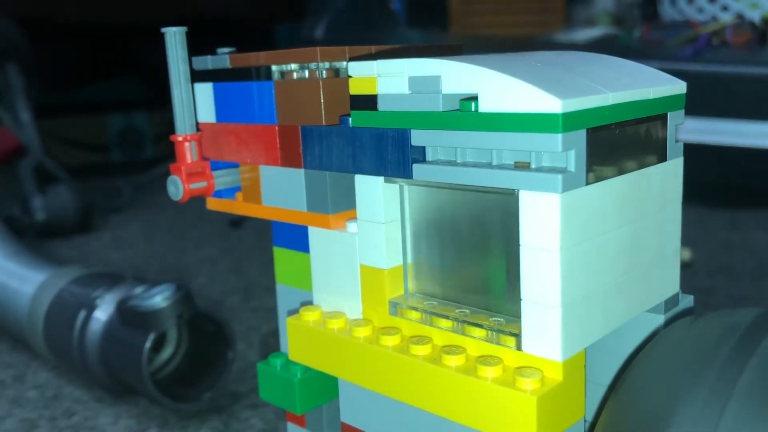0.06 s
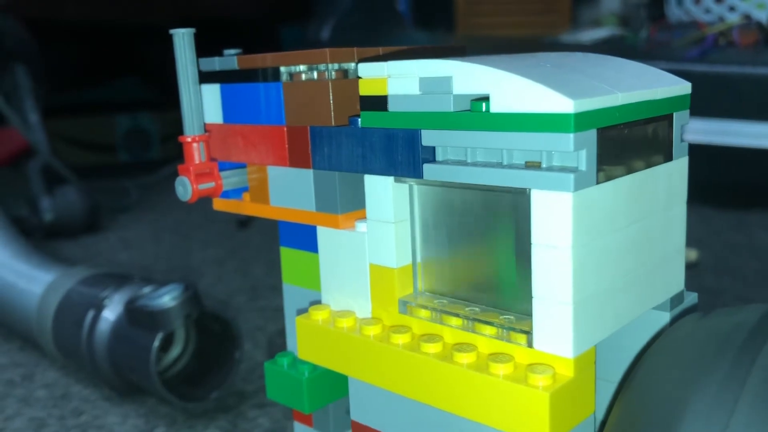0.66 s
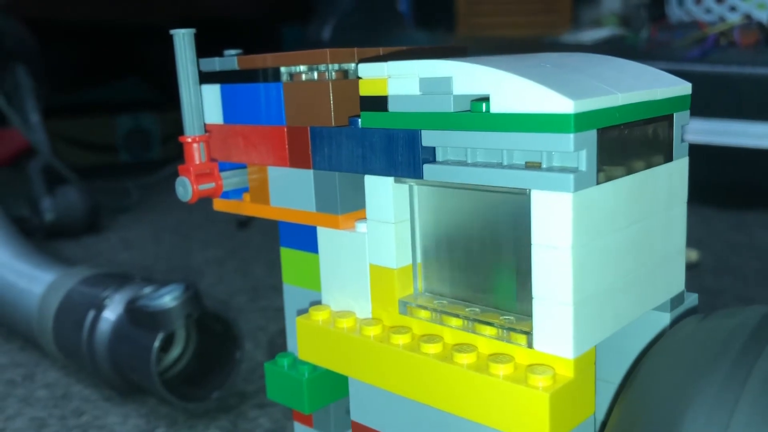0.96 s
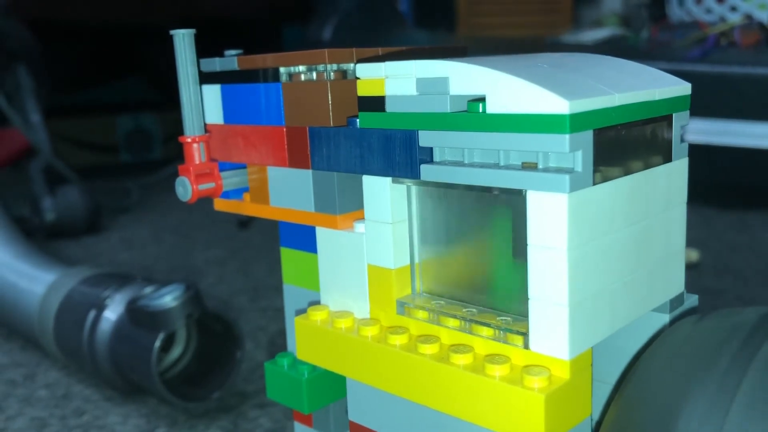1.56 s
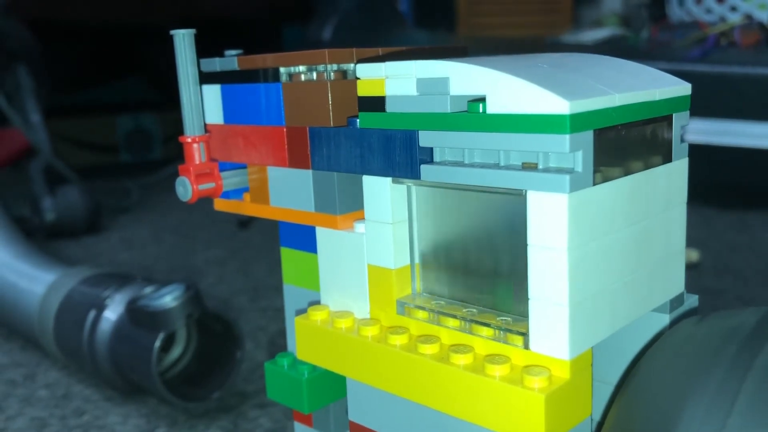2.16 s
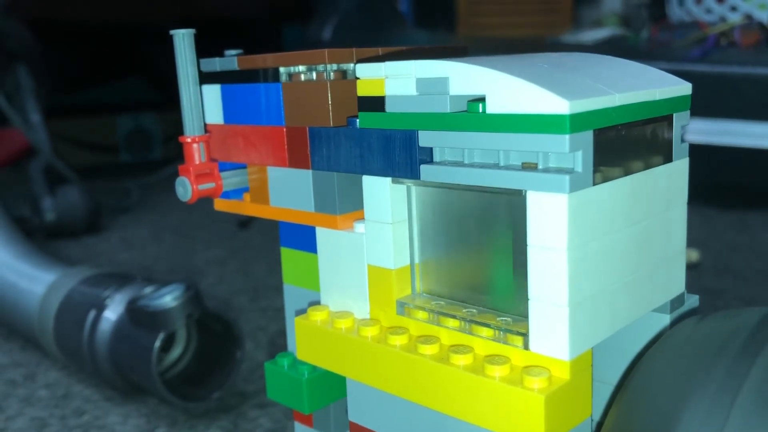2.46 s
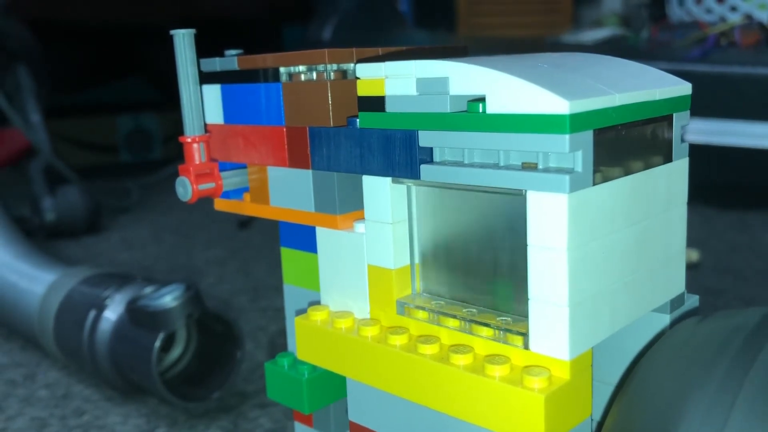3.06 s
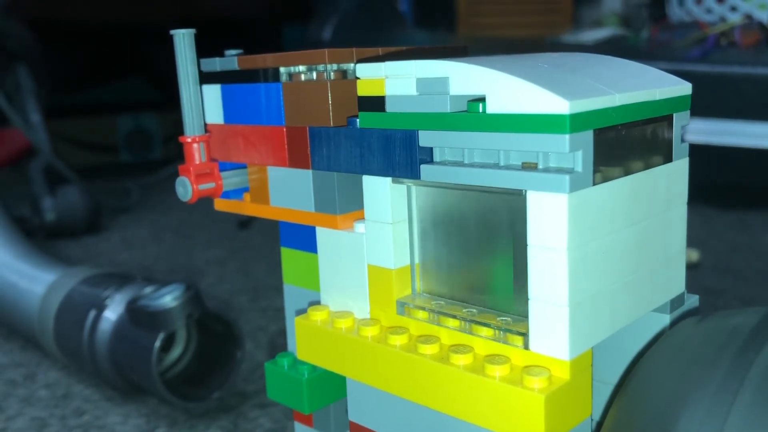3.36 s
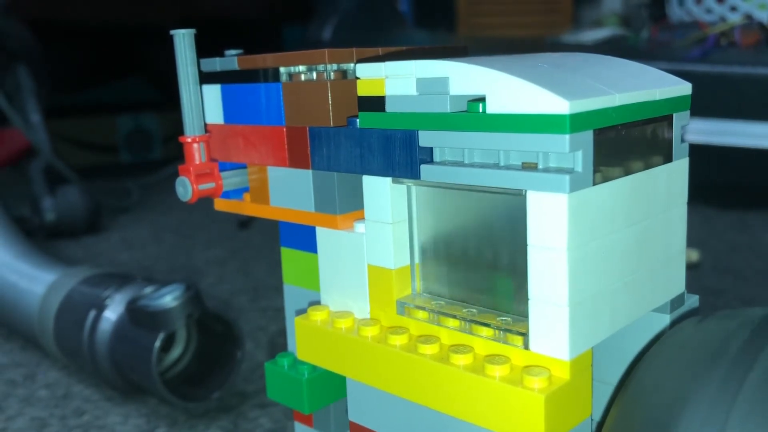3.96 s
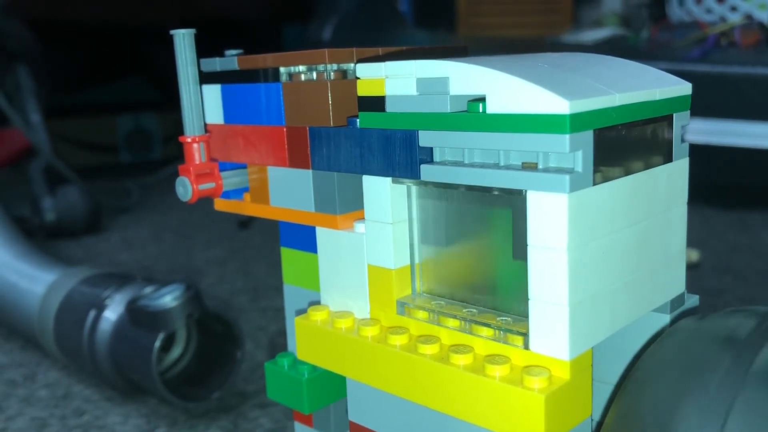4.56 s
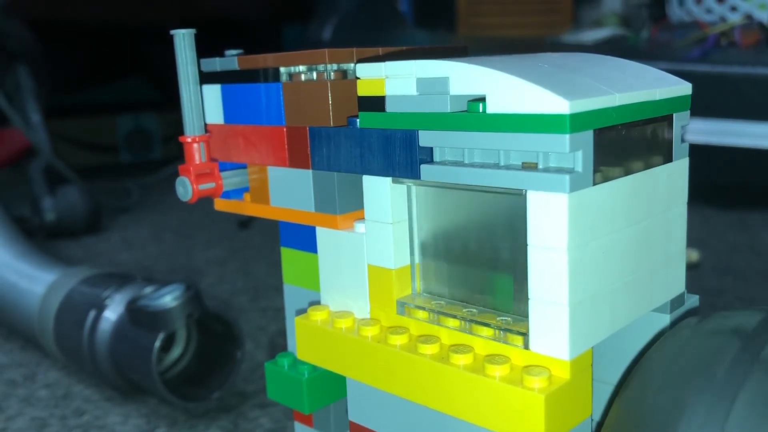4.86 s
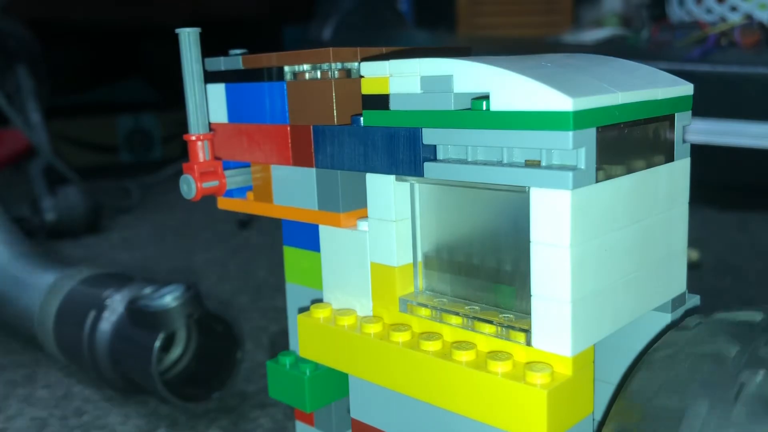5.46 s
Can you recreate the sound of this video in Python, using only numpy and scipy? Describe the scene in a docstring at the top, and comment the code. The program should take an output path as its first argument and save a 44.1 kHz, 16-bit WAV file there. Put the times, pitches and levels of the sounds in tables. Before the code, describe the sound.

A toy piston engine built of plastic bricks clacks once a turn, close to the microphone in a room. It speeds up twice and slows after each surge, with light knocks, high ticks, rattling bricks and pulsing air hiss. As it coasts to a stop, the axle gives two tiny squeaks, then a hand rustles softly. A vacuum cleaner hums faintly throughout.

```python
"""A toy piston engine of plastic bricks clacks once a turn, close by in a room, driven by suction.
It speeds up twice and coasts to a stop. Each clack cracks through the thin walls and rings frame and
chamber; the crank knocks in its play, the slide valve ticks, loose bricks chatter and intake air hisses.
A dry axle squeaks as the engine dies, then a hand rustles past. The vacuum cleaner that supplies
the suction hums throughout."""
import sys
import numpy as np
from scipy import signal
from scipy.fft import rfft, irfft
from scipy.io import wavfile

SR = 44100
rng = np.random.default_rng(int(sys.argv[2]) if len(sys.argv) > 2 else 0)


def wrap_up_sound(samples):
    """Save the sound to the file named by the first command line argument, as 16-bit audio."""
    columns = np.atleast_2d(samples).T
    # keep every value between -1 and 1, then stretch to whole-number steps
    tamed = np.clip(columns, -1, 1)
    steps = np.round(tamed * 32767).astype(np.int16)
    wavfile.write(sys.argv[1], SR, steps)


N = 247842
TIME = np.arange(N) / SR
HIT_TIME = np.arange(4096) / SR  # seconds since a hit began


def amp(db):
    """Decibels to gain."""
    return 10 ** (np.asarray(db) / 20)


def unit_rms(x):
    """Scales to rms 1."""
    return x / np.sqrt(np.mean(x ** 2) + 1e-20)


def hit_at(x, db, hold_s=.02):
    """Gives a hit the energy of a steady sound held at this level for hold_s."""
    return amp(db) * x * np.sqrt(hold_s * SR / (np.sum(x ** 2) + 1e-20))


def curve_at(points, hz):
    """Reads a curve on a log-frequency axis."""
    point_hz, value = np.transpose(points)
    return np.interp(np.log(hz + 1), np.log(point_hz), value)


def add(mix, s, sound):
    """Mixes a sound in at time s."""
    part = mix[max(0, round(s * SR)):][:len(sound)]
    part += sound[:len(part)]


def wander(rate_hz):
    """Smooth random modulation of rms 1."""
    rolloff = np.exp(-(np.fft.rfftfreq(N, 1 / SR) / rate_hz) ** 2)
    return unit_rms(irfft(rfft(rng.standard_normal(N)) * rolloff, N))


def noise(eq, walled=True):
    """Steady noise through an EQ curve; walled adds the colour of the engine's body."""
    hz = np.fft.rfftfreq(N, 1 / SR)
    gain = amp(curve_at(eq, hz) + walled * body_db(hz))
    return unit_rms(irfft(rfft(rng.standard_normal(N)) * gain, N))


def ring(modes, swell_s, detune, uneven_db, tilt_db=0):
    """Modes swell and die; loose joints shift their pitch and balance from hit to hit."""
    hz, db, t60 = np.transpose(modes)[:, :, None]
    pitch, size, phase = rng.standard_normal((len(modes), 3)).T[:, :, None]
    level_db = db + uneven_db * size + tilt_db * np.log2(hz / hz[0]) - 60 * HIT_TIME / t60
    waves = amp(level_db) * np.sin(2 * np.pi * (hz * (1 + detune * pitch) * HIT_TIME + phase))
    attack = 1 - np.exp(-(HIT_TIME / swell_s) ** 2)
    return waves.sum(0) * attack


# Reverb time of the room: (frequency [Hz], t60 [s])
ROOM_DECAY = [(200, 0.51), (1500, 0.19), (5000, 0.1), (14000, 0.028)]
def room(x, predelay_s=0.0074):
    """A short, diffuse tail whose treble dies first."""
    hz, t, bands = signal.stft(rng.standard_normal(SR // 2), SR, nperseg=256)
    decay = np.exp(-np.log(1000) * t / curve_at(ROOM_DECAY, hz)[:, None])
    tail = signal.istft(bands * decay, SR, nperseg=256)[1]
    tail *= np.clip(np.arange(len(tail)) / (predelay_s * SR) - 1, 0, 1)
    return signal.fftconvolve(x, tail / np.linalg.norm(tail))[:N]


# Partials of the vacuum cleaner's hum: (frequency [Hz], rms level [dB])
HUM_PARTIALS = [(62, -70.5), (107.4, -59), (161, -73), (211, -70), (264, -72.5), (507, -75.5)]
# EQ of its low rush: (frequency [Hz], gain [dB])
RUSH_EQ = [(20, -35), (40, -34.5), (60, 2), (85, 3), (130, 7), (210, 1.5), (330, -9.5), (480, -5.5),
           (750, -7.5), (1500, -11.5), (3000, -25.5), (7000, -41), (15500, -34.5)]
def vacuum_cleaner(rush_db=-58):
    """The bed of the scene: a wavering hum over a low rush of air."""
    wobbly_time = np.cumsum(1 + 0.007 * wander(4)) / SR
    hum = sum(amp(db + 1.3 * wander(4)) * np.sqrt(2) * np.sin(2 * np.pi * hz * wobbly_time)
              for hz, db in HUM_PARTIALS)
    return hum + amp(rush_db + wander(20)) * noise(RUSH_EQ, walled=False)


# Envelope of the hand's rustle: (time [s], level [dB])
RUSTLE_ENVELOPE = [(5.1, -74), (5.17, -63), (5.26, -53), (5.31, -58.5), (5.43, -60.5), (5.53, -58.5),
                   (5.62, -66)]
# EQ of the rustle: (frequency [Hz], gain [dB])
RUSTLE_EQ = [(100, -1), (400, 8), (800, 0), (2400, -0.5), (3100, 0), (3700, -2.5), (5200, -3.5), (6200, -5),
             (9000, -11), (15500, -15)]
def hand():
    """A soft rustle swells as a hand reaches past the stopped engine."""
    level_db = np.interp(TIME, *np.transpose(RUSTLE_ENVELOPE)) + wander(60)
    return amp(level_db) * noise(RUSTLE_EQ)


def flywheel_turns(surge_ratio=1.5):
    """Start and length of each turn, clack to clack, and whether it surges: far faster than the last."""
    clack_s = np.transpose(PISTON_CLACKS)[0]
    turn_s = np.diff(clack_s)
    surge = np.append(False, turn_s[:-1] > surge_ratio * turn_s[1:])
    return clack_s[:-1], turn_s, surge


def speed(s, start_speed=4.5, rest_s=5.04):
    """Flywheel speed [turns/s]: it stays slow until a surge begins, and finally coasts to rest."""
    start_s, turn_s, surge = flywheel_turns()
    before_surge = np.roll(surge, -1)
    at_s = start_s + turn_s * np.where(before_surge, .9, .5)
    return np.interp(s, [0, *at_s, rest_s], [start_speed, *(1 / turn_s), 0])


def halvings(full_speed=10):
    """How many octaves the flywheel is below full speed [turns/s], at every moment."""
    return np.log2(full_speed / (speed(TIME) + 1e-3))


CRANK_LAG, VALVE_LAG = .068, .093  # how late contacts land in a surge [turns]
def each_turn(timing, levels, surge_lag, surge_db):
    """Cues (time, level) for a contact that comes round every turn, set by that turn's speed."""
    start_s, turn_s, surge = flywheel_turns()
    share = np.interp(1 / turn_s, *np.transpose(timing)) + surge_lag * surge
    db = np.interp(1 / turn_s, *np.transpose(levels)) + surge_db * surge
    return list(zip(start_s + turn_s * share, db))


# Broad resonances of the thin brick walls: (centre [Hz], width [Hz], boost [dB])
WALL_PEAKS = [(2190, 150, 1), (2560, 350, 0), (4120, 220, 3), (4990, 650, 4.5), (8110, 770, 4.5)]
def body_db(hz, comb_hz=379, feedback=0.17):
    """The engine's colour: wall resonances plus an even comb of peaks every 379 Hz."""
    comb = 1 / abs(1 - feedback * np.exp(-2j * np.pi * hz / comb_hz))
    peaks_db = sum(db / (1 + (2 * (hz - centre) / width) ** 2) for centre, width, db in WALL_PEAKS)
    return 20 * np.log10(comb) + peaks_db


# EQ of a crack of plastic on plastic: (frequency [Hz], gain [dB])
CRACK_EQ = [(60, -30), (200, -9), (500, -9), (1000, 5), (1800, 3), (2600, 3.5), (3400, -2), (4500, -7.5),
            (7000, -9.5), (9500, -13), (12000, -18.5), (15500, -23)]
def wall_click(tilt_db):
    """Impulse response of the brick walls, tilted by tilt_db an octave above about 3 kHz."""
    hz = np.fft.rfftfreq(len(HIT_TIME), 1 / SR)
    eq_db = curve_at(CRACK_EQ, hz) + body_db(hz) + tilt_db * np.log2(1 + hz / 3000)
    cepstrum = irfft(np.log(amp(eq_db)))
    cepstrum[1:len(hz) - 1] *= 2  # minimum phase keeps the attack sharp
    cepstrum[len(hz):] = 0
    return irfft(np.exp(rfft(cepstrum)))


def contact(click, decay_s, shake_db, shake_s):
    """A sharp transient and the shaking that follows, heard through the walls."""
    envelope = np.exp(-HIT_TIME / decay_s) + amp(shake_db) * np.exp(-HIT_TIME / shake_s)
    envelope *= 1 - np.exp(-HIT_TIME / 0.00028)  # plastic gives a little
    burst = envelope * rng.standard_normal(len(HIT_TIME))
    return signal.fftconvolve(burst, click)[:len(HIT_TIME)]


# Modes of the brick frame: (frequency [Hz], relative level [dB], t60 [s])
FRAME_MODES = [(403.4, -22.5, 0.049), (642.3, -13.5, 0.052), (768, -13.5, 0.044), (916.6, -0.5, 0.033),
               (1014, 9.5, 0.018), (1070, -14, 0.063)]
def frame(**voicing):
    """The frame's thud, the low body of a hit."""
    return ring(FRAME_MODES, **voicing)


# Modes of the piston chamber: (frequency [Hz], relative level [dB], t60 [s])
CHAMBER_MODES = [(1080, -7, 0.0088), (1390, -23, 0.032), (1564.5, -1.5, 0.038), (1661, -5.5, 0.021),
                 (1770, -10, 0.027), (1900, -15.5, 0.038), (2150, -14.5, 0.023)]
def chamber(**voicing):
    """The chamber's hollow midrange ring."""
    return ring(CHAMBER_MODES, **voicing)


# EQ of the intake hiss: (frequency [Hz], gain [dB])
HISS_EQ = [(100, -5.5), (400, 5), (1500, 10.5), (2700, 3), (4200, -4), (5200, -3), (6500, -17),
           (8500, -9.5), (10500, -17), (15500, -14)]
def intake(gain_db=-44, db_per_halving=8.5, peak_share=0.22, swell_db=4, last_turn_end_s=5.2):
    """Air hisses past piston and valve, swelling once a turn and fading as the engine slows."""
    strokes_s = np.append(np.transpose(PISTON_CLACKS)[0], last_turn_end_s)
    turns = np.interp(TIME, strokes_s, np.arange(len(strokes_s)))
    opening_db = swell_db * np.tanh(2 * np.cos(2 * np.pi * (turns - peak_share)) + .5)
    fader_db = gain_db - db_per_halving * halvings()
    air = noise(HISS_EQ)
    hollow = chamber(swell_s=0.0022, detune=0, uneven_db=-4.5)
    rubbing = unit_rms(signal.oaconvolve(air, hollow)[:N])  # sliding keeps the chamber ringing
    return amp(fader_db + opening_db) * (air + amp(-1) * rubbing)


# Glides of the dry axle, one list a squeak: (time [s], pitch [Hz], level [dB])
AXLE_GLIDES = [
    [(4.04, 2540, -55), (4.065, 2320, -47), (4.085, 2200, -65)],
    [(4.52, 2320, -53), (4.54, 2420, -61), (4.547, 2360, -39.5), (4.565, 2354, -50), (4.578, 2330, -76)],
]
def axle(harmonics_db=(0, -11, -19)):
    """Stick and slip: short squeaks, shaky in pitch and strength."""
    out = np.zeros(N)
    for glide in AXLE_GLIDES:
        s, hz, db = np.transpose(glide)
        cycles = np.cumsum(np.interp(TIME, s, hz) * (1 + .024 * wander(500))) / SR
        tone = sum(gain * np.sin(2 * np.pi * k * cycles) for k, gain in enumerate(amp(harmonics_db), 1))
        gate = (TIME > s[0]) * (TIME < s[-1])
        out += unit_rms(tone) * amp(np.interp(TIME, s, db) + 1.5 * wander(250)) * gate
    return out


def touch(click):
    """One light touch between bricks: a tick and a little ring of the chamber."""
    tick = contact(click, decay_s=0.0016, shake_db=-24, shake_s=.005)
    hollow = chamber(swell_s=0.0022, detune=0.052, uneven_db=6)
    return hit_at(tick, -5) + hit_at(hollow, -2.9)


def chatter(gain_db=-36.5, db_per_halving=9, top_per_s=150, spread_db=3.5, bricks=24):
    """Loose bricks touch at random, more often, harder and brighter the faster the engine runs."""
    out, click = np.zeros(N), wall_click(tilt_db=2.5)
    fader = amp(gain_db - db_per_halving * halvings())
    per_s = top_per_s * (fader / fader.max()) ** .75
    strengths = amp(spread_db * np.minimum(rng.exponential(1, N), 3))
    triggers = strengths * (rng.random(N) < per_s / SR)
    brick = rng.integers(0, bricks, N)
    for k in range(bricks):
        voice = touch(click) + hit_at(frame(swell_s=0.005, detune=0.031, uneven_db=6), -10.5)
        out += signal.oaconvolve(triggers * (brick == k), voice)[:N]
    lows = signal.sosfiltfilt(signal.butter(2, 2600, fs=SR, output="sos"), out)
    treble_gain = amp(-1.5 * halvings())
    return fader * (lows + treble_gain * (out - lows)) / np.std(out)


# Loose bricks that click out of the chatter: (time [s], level [dB])
BRICK_CLICKS = [(0.497, -29), (1.8011, -47), (3.5598, -45.5), (3.8119, -45), (4.1395, -46), (4.3105, -60),
                (4.635, -62), (4.6834, -50), (4.7735, -65.5), (4.875, -63), (5.1898, -53), (5.2085, -54)]
# Timing of the rod's sideways slap in mid-stroke: (speed [turns/s], delay after the clack [turns])
SLAP_TIMING = [(7, .28), (9, .27)]
# Weight of that slap: (speed [turns/s], level [dB])
SLAP_LEVELS = [(4, -53), (7, -51), (9, -34)]
def clicks():
    """Accents over the chatter: the rod's slap in each turn, and a few loose bricks."""
    out, click = np.zeros(N), wall_click(tilt_db=0.5)
    for s, db in BRICK_CLICKS + each_turn(SLAP_TIMING, SLAP_LEVELS, CRANK_LAG, surge_db=-10):
        add(out, s, hit_at(touch(click), db))
    return out


# Modes of the valve's slider: (frequency [Hz], relative level [dB], t60 [s])
SLIDER_MODES = [(5160, -18.5, 0.013), (6763, -2, 0.0095), (7670, -31, 0.035), (9330, -11.5, 0.019),
                (11100, -3.5, 0.0053), (12900, -12.5, 0.0047), (14800, -16, .008)]
def slider(cues, tilt_db, touch_db):
    """The light slider gives short, high ticks at one of its stops."""
    out, click = np.zeros(N), wall_click(tilt_db=5)
    for s, db in cues:
        ping = ring(SLIDER_MODES, swell_s=0.00053, detune=0.019, uneven_db=4.5, tilt_db=tilt_db)
        tick = contact(click, decay_s=0.0032, shake_db=11.5, shake_s=0.0061)
        add(out, s, hit_at(ping, db) + hit_at(tick, db + touch_db))
    return out


# Timing of the valve's opening tick: (speed [turns/s], delay after the clack [turns])
OPEN_TIMING = [(5.9, .6), (6.5, .565), (7.7, .537), (10, .52)]
# Weight of the opening tick: (speed [turns/s], level [dB])
OPEN_LEVELS = [(5, -68.5), (6.3, -38), (7.7, -31.5), (10, -30.5)]
# Timing of the closing tick: (speed [turns/s], delay after the clack [turns])
SHUT_TIMING = [(3.5, .67), (5.2, .72), (6.5, .785), (8.4, .828), (10.5, .85)]
# Weight of the closing tick: (speed [turns/s], level [dB])
SHUT_LEVELS = [(3.5, -69.5), (5.7, -49), (6.5, -43.5), (10.5, -38.5)]
def valve():
    """The slide valve opens with a firm tick and shuts with a thinner, brighter one."""
    opens = each_turn(OPEN_TIMING, OPEN_LEVELS, VALVE_LAG, surge_db=3)
    shuts = each_turn(SHUT_TIMING, SHUT_LEVELS, VALVE_LAG, surge_db=0.5)
    return slider(opens, tilt_db=-6.5, touch_db=-1.5) + slider(shuts, tilt_db=16.5, touch_db=-2.5)


def knocks(cues, damping_s, touch_db):
    """Dull knocks that mostly ring the chamber, until the moving piston damps it."""
    out, click = np.zeros(N), wall_click(tilt_db=-5)
    choke = np.exp(-(HIT_TIME / damping_s) ** 2)
    for s, db in cues:
        hollow = chamber(swell_s=.0045, detune=.008, uneven_db=2) * choke
        tap = contact(click, decay_s=0.002, shake_db=5, shake_s=0.01)
        add(out, s, hit_at(hollow, db) + hit_at(tap, db + touch_db))
    return out


# The crank rocks in its play when the engine nearly stalls: (time [s], level [dB])
STALL_KNOCKS = [(0.1072, -29), (0.1802, -37), (3.8653, -49.5), (4.1247, -45.5), (4.216, -52.5),
                (4.483, -47.5), (4.6332, -46), (4.682, -58), (4.7735, -59.5), (4.84, -58.5),
                (4.9412, -38.5)]
# Timing of its knock on the return stroke: (speed [turns/s], delay after the clack [turns])
RETURN_TIMING = [(4.4, .523), (5.85, .533), (6.5, .572), (8.5, .572), (10.8, .635)]
# Weight of that knock: (speed [turns/s], level [dB])
RETURN_LEVELS = [(3.5, -52), (4.5, -40.5), (5.85, -26.5), (7.1, -22.5), (8.4, -25.5), (10.8, -26.5)]
def crank(rebound_s=.0175, rebound_turns=.022, rebound_db=-37.5):
    """The crank knocks as it takes up its play, as the rod rebounds from a clack, and when it rocks."""
    returns = each_turn(RETURN_TIMING, RETURN_LEVELS, CRANK_LAG, surge_db=1)
    rebounds = [(s + rebound_s + rebound_turns / speed(s), rebound_db) for s, _, _ in PISTON_CLACKS]
    tight = knocks(returns, damping_s=.014, touch_db=-11)
    loose = knocks(rebounds + STALL_KNOCKS, damping_s=.03, touch_db=-8)
    return tight + loose


# The piston ends its stroke, once a turn: (time [s], crack level [dB], chamber level [dB])
PISTON_CLACKS = [(0.0075, -30.5, -27.5), (0.3098, -30, -26.5), (0.4278, -25.5, -26.5), (0.5209, -23.5, -26),
                 (0.623, -24.5, -22.5), (0.7319, -26.5, -30.5), (0.8514, -27.5, -27),
                 (0.9794, -27.5, -27.5), (1.1196, -30, -29), (1.274, -29, -28.5), (1.4442, -31.5, -26.5),
                 (1.637, -32.5, -34.5), (1.8598, -35, -30.5), (2.1337, -36, -26), (2.2792, -24.5, -28.5),
                 (2.3812, -25, -27), (2.4927, -24, -33), (2.612, -28, -24.5), (2.7415, -27.5, -24.5),
                 (2.8825, -28, -28.5), (3.0377, -29, -26), (3.2111, -30.5, -29), (3.4047, -31.5, -29.5),
                 (3.63, -35.5, -30.5), (3.902, -38, -29.5), (4.2615, -45, -34.5)]
def piston(firm_crack_db=-27, firm_thud_db=-31):
    """Each clack is a crack with two quick bounces; frame and chamber ring up behind it."""
    out, bright_click = np.zeros(N), wall_click(tilt_db=7.5)
    for s, crack_db, ring_db in PISTON_CLACKS:
        click = wall_click(tilt_db=0.35 * (crack_db + 35))  # harder hits are brighter
        bounce_s, flick_s = s + rng.normal([.0038, .01], [.0003, .0006])
        crack = contact(click, decay_s=0.00071, shake_db=2, shake_s=0.0027)
        bounce = contact(click, decay_s=0.00073, shake_db=-10.5, shake_s=0.0085)
        flick = contact(bright_click, decay_s=0.00085, shake_db=-14, shake_s=0.0024)
        thud = frame(swell_s=.003, detune=.012, uneven_db=2)
        thud_db = firm_thud_db + 0.49 * (crack_db - firm_crack_db)  # half the crack's dynamics
        hollow = chamber(swell_s=0.0058, detune=0.017, uneven_db=5.5)
        add(out, s, hit_at(crack, crack_db))
        add(out, bounce_s, hit_at(bounce, crack_db - 3.5))
        add(out, flick_s, hit_at(flick, crack_db - 8.5))
        add(out, s + 0.001608, hit_at(thud, thud_db))
        add(out, s + 0.00038, hit_at(hollow, ring_db))
    return out


def scene(reverb_db=-20):
    """The engine up front and nearly dry, with vacuum cleaner and hand behind, in mono."""
    engine = piston() + crank() + valve() + chatter() + clicks() + intake() + axle()
    return (engine + amp(reverb_db) * room(engine) + vacuum_cleaner() + hand())[None]


def record(dry):
    """A steep high cut at 15.9 kHz on the whole mix."""
    high_cut = signal.firwin(255, 15900, window=("kaiser", 8), fs=SR)
    return signal.oaconvolve(dry, high_cut[None], "same")


dry = scene()
out = record(dry)
wrap_up_sound(out)
```